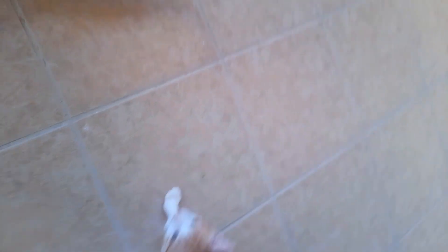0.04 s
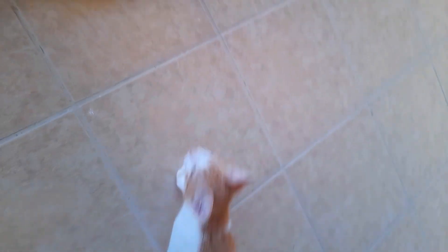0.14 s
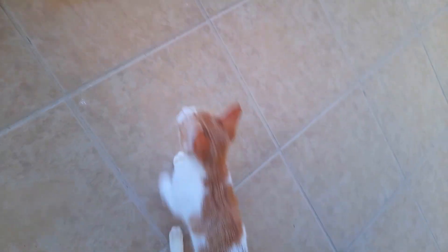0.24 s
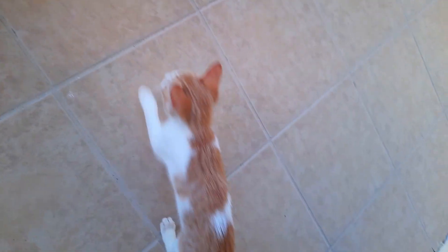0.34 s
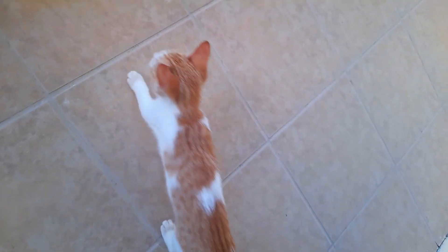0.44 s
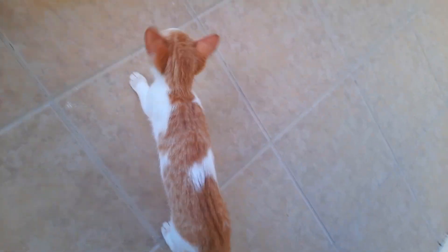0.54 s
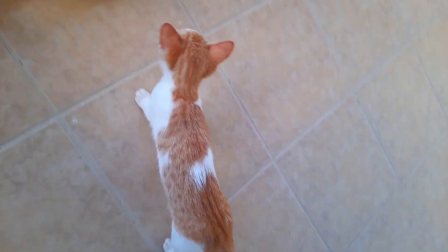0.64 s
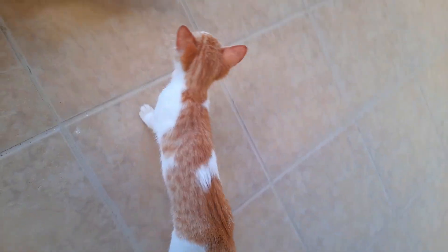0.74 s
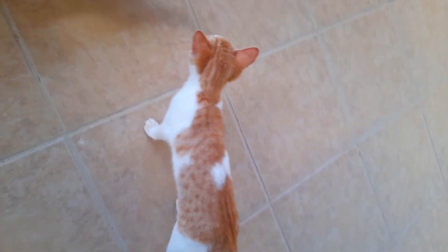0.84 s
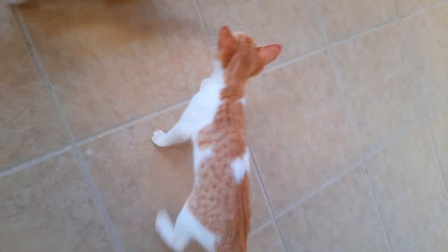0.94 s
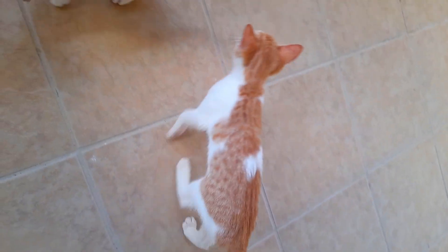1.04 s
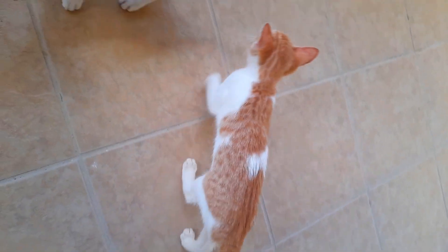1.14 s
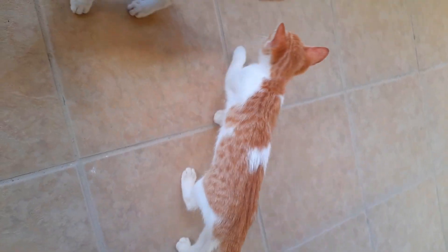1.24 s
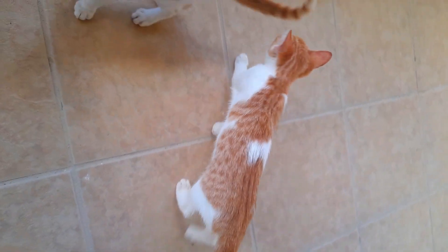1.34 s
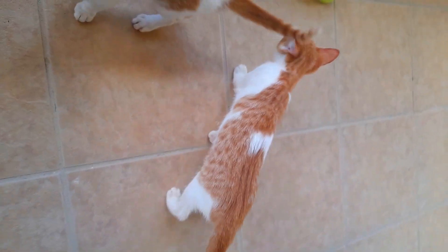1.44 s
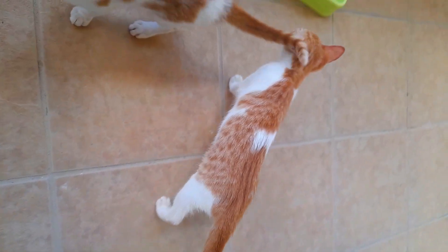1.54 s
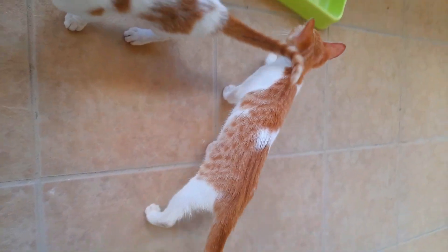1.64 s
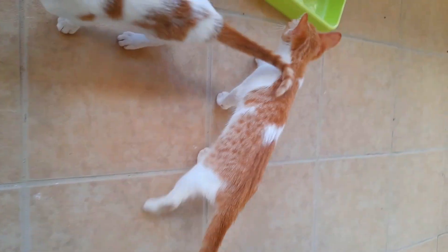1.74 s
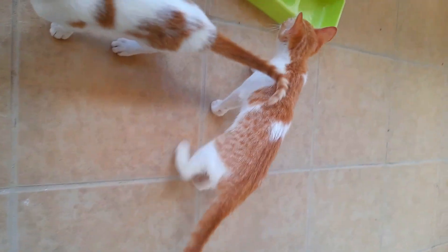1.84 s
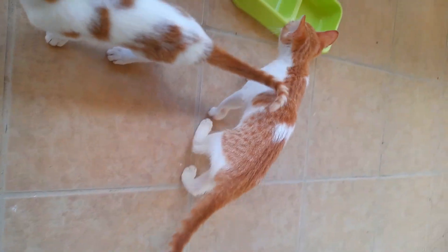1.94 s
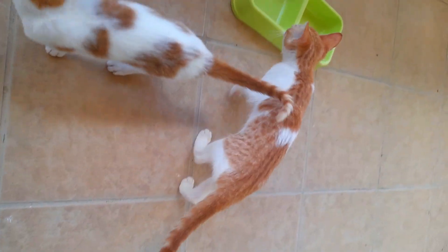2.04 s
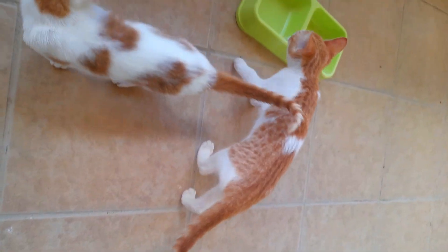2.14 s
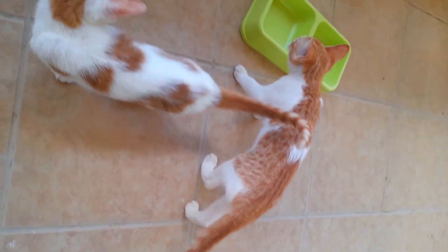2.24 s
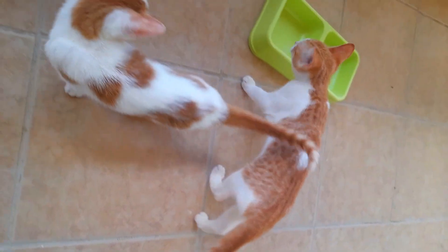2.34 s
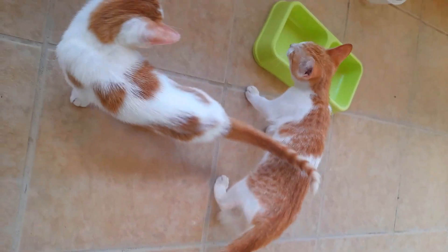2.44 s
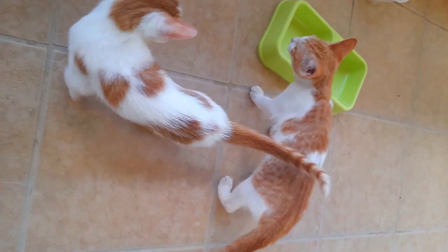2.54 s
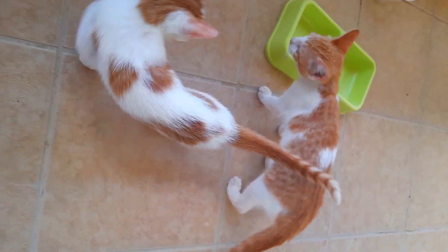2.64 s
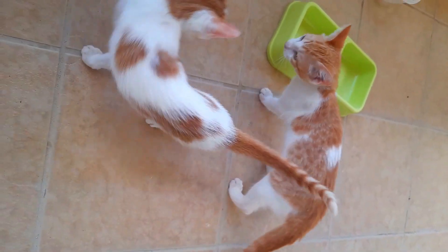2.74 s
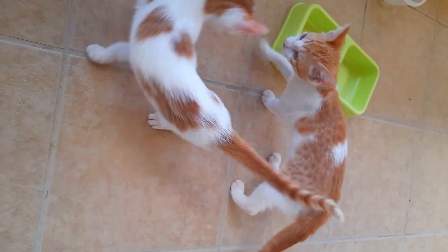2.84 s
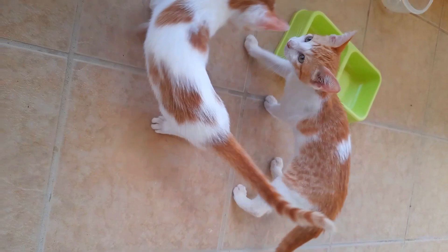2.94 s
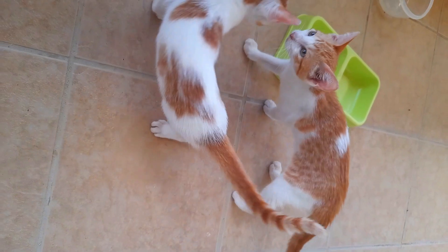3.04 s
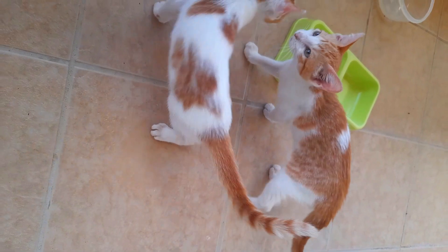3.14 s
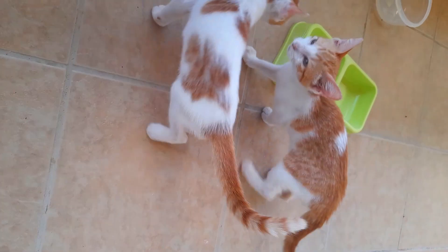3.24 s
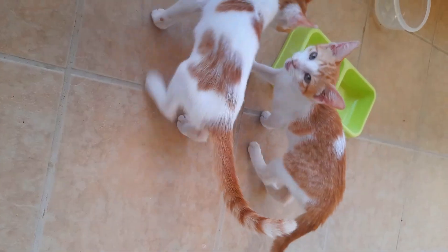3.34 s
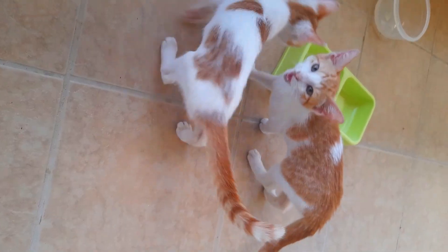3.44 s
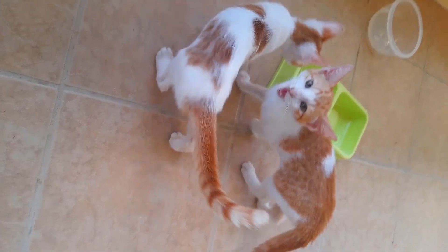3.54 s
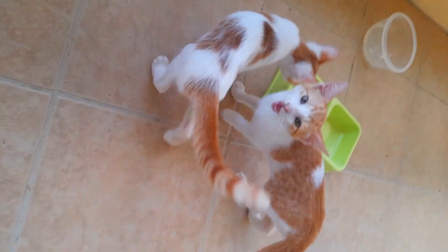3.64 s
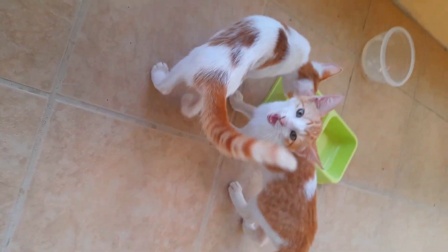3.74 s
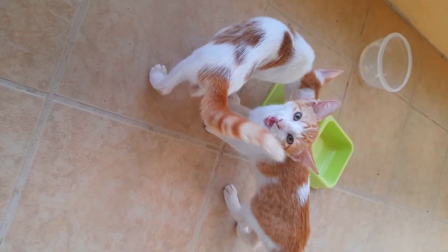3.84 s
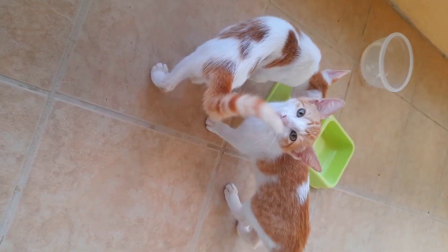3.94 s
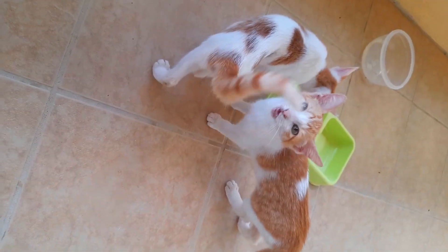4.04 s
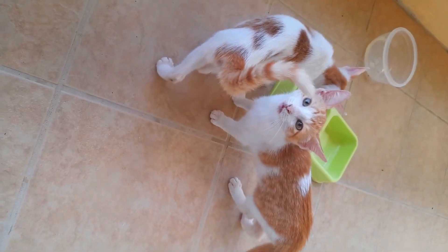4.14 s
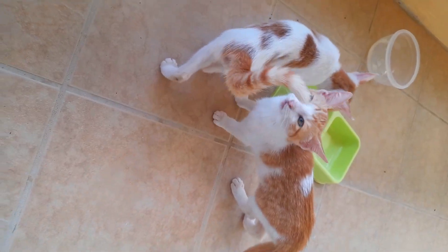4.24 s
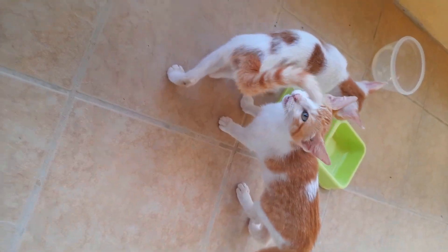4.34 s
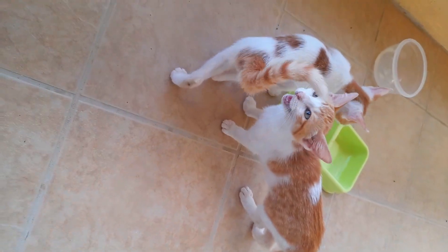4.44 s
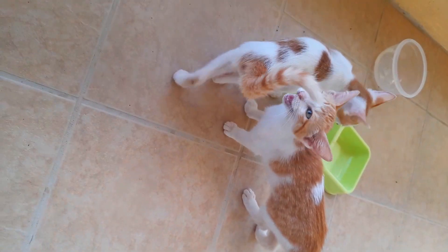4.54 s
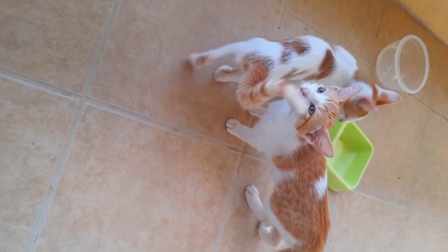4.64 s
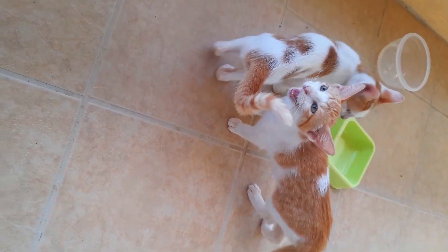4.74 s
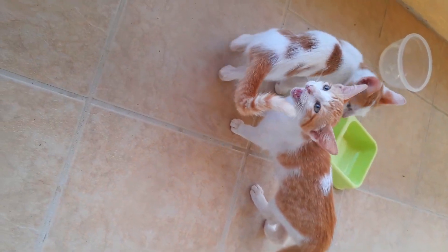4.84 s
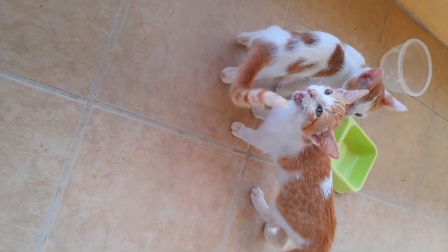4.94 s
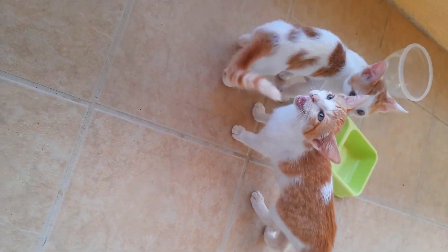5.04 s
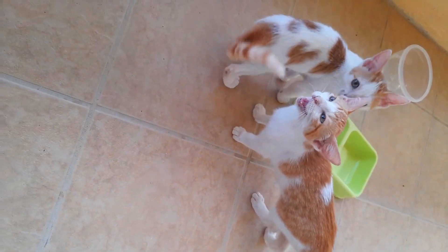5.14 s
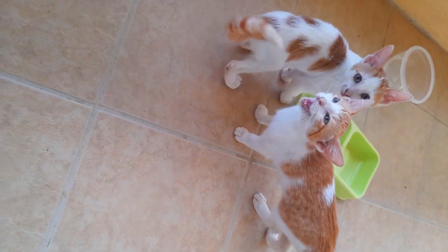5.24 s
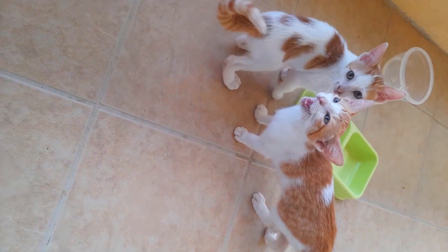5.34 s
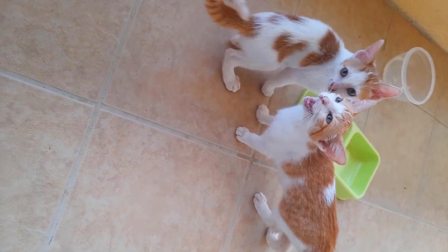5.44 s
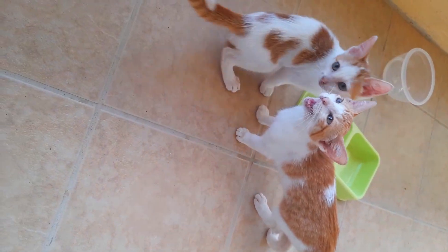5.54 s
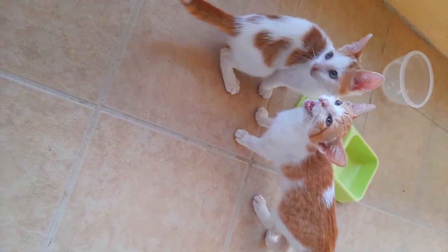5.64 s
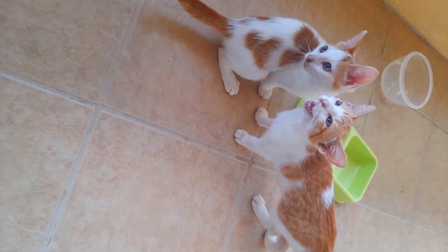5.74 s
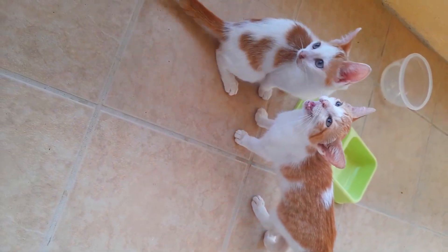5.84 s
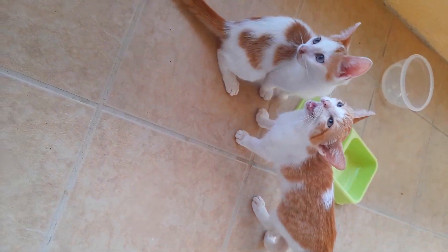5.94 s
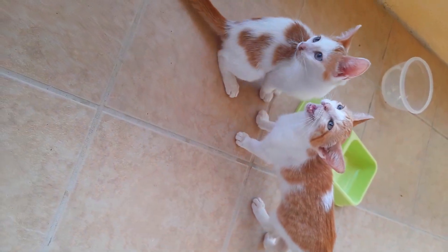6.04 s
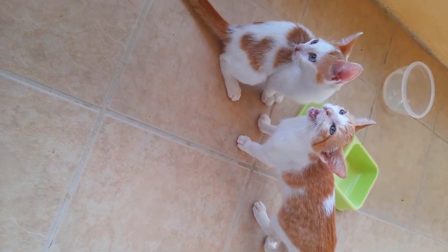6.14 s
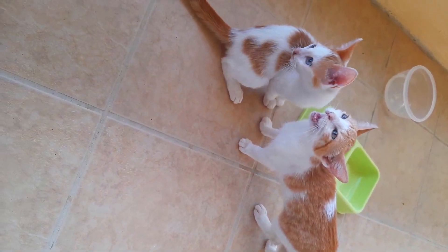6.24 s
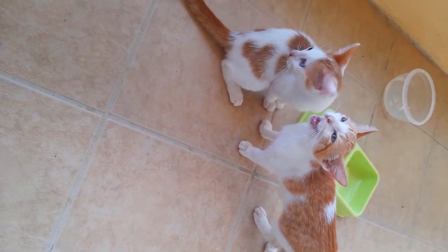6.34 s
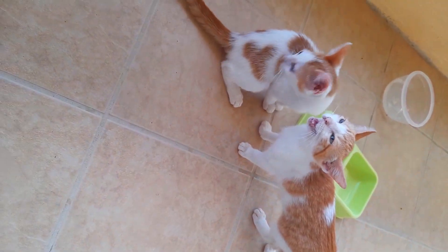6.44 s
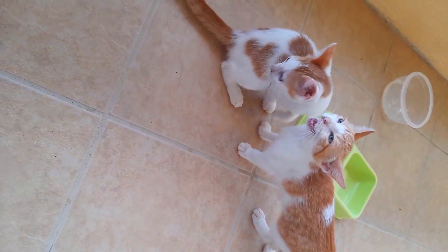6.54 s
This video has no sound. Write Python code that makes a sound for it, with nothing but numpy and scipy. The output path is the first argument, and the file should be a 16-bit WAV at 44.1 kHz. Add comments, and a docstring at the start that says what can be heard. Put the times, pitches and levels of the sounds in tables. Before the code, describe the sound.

After a brief cloth rustle and a few tiny claw ticks, a kitten gives a long, clear meow that rises and sinks. A second kitten answers with a thin high squeak and short chirps. The first meows twice more, the last call longest and loudest, and a shrill, hoarse squeal joins at the end. The stereo microphone is about a metre away in a tiled room with a short ring and faint background noise.

```python
"""A tiled floor between hard walls, where two kittens beg for food a metre from a hand-held stereo mic.
One gives three long clear meows, the other squeaks high: vocal folds make a stack of partials, the mouth
shapes it and breath leaks through. Claws and tongue click, chirps, soft voice blips and a small growl
slip in, and a hoarse squeal comes last. The walls ring briefly. Cloth rustles at the start, and low
background noise, hiss, mains hum, a faint tone and far insects lie underneath."""
import sys
import numpy as np
from scipy import signal
from scipy.fft import rfft, irfft, next_fast_len
from scipy.io import wavfile
from scipy.ndimage import uniform_filter1d

SR = 44100
rng = np.random.default_rng(int(sys.argv[2]) if len(sys.argv) > 2 else 0)


def wav_record(signal):
    """Record a signal, one row per channel, as 16-bit PCM in the file named by sys.argv[1]."""
    frames = np.transpose(np.atleast_2d(signal))
    bounded = np.clip(frames, -1, 1)
    # unit amplitude maps onto the largest positive 16-bit level
    quanta = np.round(bounded * 32767).astype(np.int16)
    wavfile.write(sys.argv[1], SR, quanta)


N = 289737
T = np.arange(N) / SR
PORT_LAG_MS, TOP_HZ = 0.23, 15600  # left mic port behind the right; the recorder's treble limit


def undb(db):
    """Gain of a level in dB."""
    return 10 ** (np.asarray(db) / 20)


def unit(x):
    """Scale to rms 1."""
    return x / np.sqrt(np.mean(x ** 2))


def curve(points):
    """Draw (seconds, value) points as a line through the whole scene."""
    return np.interp(T, *np.transpose(points))


def shape(points, hz):
    """Read a (Hz, dB) spectrum on a log axis."""
    f, db = np.transpose(points)
    return np.interp(np.log(np.maximum(hz, 1)), np.log(f), db)


def band(n, hz, width):
    """Noise of rms 1 in one resonance."""
    size = next_fast_len(n)
    f = np.fft.rfftfreq(size, 1 / SR)
    gain = 1 / (1 + ((f ** 2 - hz ** 2) / (f * width + 1e-9)) ** 2)
    return unit(irfft(rfft(rng.standard_normal(n), size) * gain, size)[:n])


def coloured(points, alike_hz):
    """Stereo noise of rms 1 with a given spectrum, narrower in the image below alike_hz."""
    size = next_fast_len(N)
    f = np.fft.rfftfreq(size, 1 / SR)
    mid, side = rfft(rng.standard_normal((2, size))) * undb(shape(points, f))
    alike = .55 / (1 + (f / alike_hz) ** 2)
    mid, side = mid * np.sqrt(1 + alike), side * np.sqrt(1 - alike)
    return unit(irfft(np.array([mid + side, mid - side]), size)[:, :N])


def walk(n, rate):
    """Smooth random wobble, rate steps a second, with a spread near 1."""
    hold = int(SR / rate)
    steps = np.repeat(rng.standard_normal(n // hold + 1), hold)
    return 1.3 * uniform_filter1d(uniform_filter1d(steps, hold), hold)[:n]


def walks(n, rate):
    """A function that deals left-right pairs of wobbles, cut at random from one long walk."""
    long = walk(3 * n, rate)
    return lambda: np.array([long[k:k + n] for k in rng.integers(0, 2 * n, size=2)])


def read(table):
    """A table's span, its columns as curves, and edge fades; no fade-out if it reaches the scene's end."""
    s, *columns = np.transpose(table)
    stop = np.inf if s[-1] > T[-1] - .05 else s[-1]
    span = slice(int(max(s[0], 0) * SR), int(min(stop * SR, N)))
    t = T[span]
    fades = np.clip(np.minimum((t - s[0]) / 0.0066, (stop - t) / 0.027), 0, 1)
    return span, [np.interp(t, s, c) for c in columns], fades


def place(x, left_db):
    """Pan a sound so the left is left_db louder than the right."""
    return x * undb(np.array([[left_db], [-left_db]]) / 2)


def decay(start, t60, rise_s):
    """Envelope with a fast attack that dies by 60 dB in t60 seconds."""
    t = np.clip(T - start, 0, None)
    return (1 - np.exp(-t / rise_s)) * np.exp(-np.log(1000) * t / t60)


# Low background noise, up with the calls and turned down between. Each row: time in seconds, level in dB.
LOW_NOISE_LEVEL = [(0, -66), (.44, -69.5), (.8, -64), (1.5, -75), (1.76, -67), (2.0, -69.5), (2.4, -65),
                   (2.5, -75), (3.3, -72.5), (3.62, -64.5), (3.75, -68), (4.1, -70), (4.37, -78),
                   (4.5, -69.5), (4.95, -68), (5.23, -67), (5.55, -63), (5.85, -70), (6.3, -66),
                   (6.39, -62), (6.57, -66.5)]
# Tone colour of the low noise and the hiss. Each row: frequency in Hz, relative level in dB.
LOW_NOISE_COLOUR = [(15, -42), (25, -58), (54, -7), (102, -3), (199, -12), (308, -11.5), (350, -10),
                    (399, -13.5), (972, -22), (1200, -44), (1560, -78), (2640, -120)]
HISS_COLOUR = [(400, -1.5), (800, -4.5), (1200, -12.5), (1800, -7.5), (2500, -13.5), (4500, -16),
               (8000, -16), (15500, -16)]


def room_tone():
    """The bed: low noise on the left, turned down between the calls, soft hiss and wavering mains hum."""
    low = coloured(LOW_NOISE_COLOUR, alike_hz=450) * undb(curve(LOW_NOISE_LEVEL) + 1.8 * walk(N, 9))
    hiss = coloured(HISS_COLOUR, alike_hz=300) * undb(-70.5 + 0.91 * walk(N, 12))
    hum = np.sqrt(2) * undb(-79.5 + 3.5 * walk(N, 11)) * np.sin(2 * np.pi * 95.6 * T)
    return place(low, left_db=9.2) + hiss + hum


# The insects' buzz. Each row: centre in Hz, width in Hz, base level in dB.
INSECT_BANDS = [(5090, 500, -83), (5790, 490, -82.5)]
# Its rise and fall. Each row: time in seconds, gain in dB.
INSECT_SWELL = [(0, -2), (2.2, 5), (2.4, 2), (2.9, 6), (3.3, -3.5), (3.5, -4.5), (6.57, -45)]


def insects():
    """Far insects blur into narrow bands of high noise that swell, then fade away."""
    out = np.zeros((2, N))
    for hz, width, db in INSECT_BANDS:
        swell_db = curve(INSECT_SWELL) + 1.8 * walk(N, 3.9)
        out += undb(db + swell_db) * np.array([band(N, hz, width), band(N, hz, width)])
    return out


# A brush of cloth. Each row: time in seconds, level in dB.
RUSTLE_LEVEL = [(0, -65), (.12, -64), (.17, -69), (.246, -62.5), (.258, -58.5), (.274, -66), (.282, -48),
                (.296, -58), (.36, -65), (.4, -71), (.5, -80)]


def cloth_rustle():
    """Rubbing cloth gives broad noise with a fast, grainy flutter."""
    span, (db,), fades = read(RUSTLE_LEVEL)
    cloth = coloured([(700, -0.5), (3000, -2), (9000, -3), (14000, -1.5)], alike_hz=2000)
    cloth *= undb(2.2 * walk(N, 93.2))
    out = np.zeros((2, N))
    out[:, span] = cloth[:, span] * undb(db) * fades
    return out


# A low tone under the opening. Each row: time in seconds, pitch in Hz, level in dB.
FAINT_TONE = [(0, 241, -74), (.1, 242, -75.5), (.55, 247.4, -73), (.85, 248.6, -70.5), (1.15, 251, -69),
              (1.5, 242.3, -78)]


def faint_tone():
    """A quiet sine that wavers in pitch and level."""
    span, (hz, db), fades = read(FAINT_TONE)
    level = undb(db + 3.5 * walk(len(hz), 11.8))
    phase = 2 * np.pi * np.cumsum(hz + 3 * walk(len(hz), 15.1)) / SR
    out = np.zeros(N)
    out[span] = np.sqrt(2) * level * fades * np.sin(phase)
    return out


# Claw and tongue ticks. Each row: start in seconds, level in dB, centre in Hz, 60 dB decay in seconds.
CLICKS = [(0.0404, -50.5, 5800, 0.021), (0.1093, -53, 6000, 0.022), (0.2562, -45.5, 6140, 0.033),
          (0.2808, -38, 6050, 0.017), (0.2994, -54, 6000, 0.03), (2.2294, -51, 6000, 0.026),
          (3.7594, -38, 6000, 0.018), (4.373, -54.5, 5900, 0.012)]


def clicks():
    """Each tap of claw or tongue is a tiny burst of bright noise."""
    return sum(undb(db) * decay(start, t60, rise_s=0.0014) * band(N, hz, 1.35 * hz)
               for start, db, hz, t60 in CLICKS)


# Roughness of both voices. Each row: time in seconds, pitch jitter in percent, half-pitch depth 0-1.
HOARSENESS = [(.5, .5, 0), (.6, 1, .1), (.64, 1, .7), (.69, .8, .6), (.72, .45, 0), (1.45, .5, 0),
              (1.51, .8, 0), (1.53, 3, .2), (1.58, 1.6, 0), (1.62, .5, 0), (1.69, 1.2, 0), (1.76, .5, 0),
              (1.9, .6, 0), (1.94, 1.3, 0), (2.04, .8, 0), (2.08, 1.6, 0), (3.4, 2.8, .1), (3.58, 1.8, .1),
              (3.66, .7, 0), (3.98, .7, 0), (4.02, 3.5, .3), (4.45, 2.5, .1), (4.7, 1.1, 0), (4.85, .25, 0),
              (5.45, .25, 0), (5.6, .5, 0), (5.75, .2, 0), (6.57, .15, 0)]
# EQ of the upper partials (mouth) and the very top (edge). Each row: frequency in Hz, gain in dB.
MOUTH_EQ = [(2500, -3), (3600, 12.5), (4500, 7), (5400, -1.5), (6300, -9)]
EDGE_EQ = [(6300, -7), (8300, -11), (10500, -2), (12000, -14), (15000, -11.5)]
# Colour of the breath. Each row: centre in Hz, width in Hz, gain in dB.
BREATH_BANDS = [(1890, 2500, -2), (3900, 4700, 0), (11200, 7800, -15.5)]
# Air leaking past the vocal folds. Each row: time in seconds, level in dB.
BREATH_LEVEL = [(.5, -64.5), (.7, -65.5), (1.0, -66.5), (1.45, -65), (1.55, -65.5), (1.65, -65.5),
                (1.9, -72), (2.1, -63.5), (2.3, -68.5), (3.35, -76), (3.45, -58), (3.65, -63), (3.9, -66),
                (4.02, -58.5), (4.1, -82), (4.43, -62), (4.7, -64.5), (4.9, -66.5), (5.3, -65), (5.6, -65),
                (5.9, -65.5), (6.57, -69)]


def voice(table, drawn_partials):
    """Vocal folds make a stack of partials, the mouth sets their levels, and breath pulses once a cycle."""
    span, (hz, *low_db, edge_db, pan_db, lag_ms), fades = read(table)
    hz = uniform_filter1d(hz, size=350)  # pitch bends without corners
    n, mouth_db, loudest_db = len(hz), low_db[-1], np.max(low_db[:drawn_partials], axis=0)
    times, jitter_percent, half_depth = np.transpose(HOARSENESS)
    jitter = np.interp(T[span], times, jitter_percent) / 100
    phase = 2 * np.pi * np.cumsum(hz * (1 + jitter * walk(n, 220))) / SR
    share_db = 10 * np.log10(hz / 2000)  # a band's power is split over its partials
    side = np.array([[-.5], [.5]])
    swell, drift, shimmer, blur = walks(n, 20), walks(n, 10), walks(n, 70), walks(n, 300)
    call = np.zeros((2, n))
    for k in range(1, int(TOP_HZ / hz.min()) + 1):
        f = k * hz
        if k <= drawn_partials:
            db = low_db[k - 1]
        else:
            high = np.clip((f - 6200) / 800, 0, 1)  # crossfade from mouth band to edge band
            db = share_db + (1 - high) * (mouth_db + shape(MOUTH_EQ, f))
            db += high * (edge_db + shape(EDGE_EQ, f))
        # standing waves push the loudest partial from port to port; weaker ones drift on their own
        lead = np.minimum(undb(db - loudest_db), 1)
        drift_db = -lead * pan_db * side + (1 - lead) * 3.0 * swell()
        drift_db += (2.4 - lead) * shimmer()  # quick unevenness, least on the loudest partial
        lag_s = (lead * lag_ms + (1 - lead) * PORT_LAG_MS) / 1000
        turn = 2 * np.pi * f * lag_s * side + (1 - lead) * .6 * drift()
        turn += (f / 12000) ** 2 * (1 + 80 * jitter) * blur()  # uneven cycles smear high partials most
        call += np.sqrt(2) * undb(db + drift_db) * (f < TOP_HZ) * np.sin(k * phase + 1.5 * k + turn)
    call *= 1 + np.interp(T[span], times, half_depth) * np.sin(phase / 2)  # strong, weak cycles alternate
    breath = np.array([sum(undb(db) * band(n, f, width) for f, width, db in BREATH_BANDS)
                       for port in range(2)])
    call += undb(curve(BREATH_LEVEL)[span]) * breath * (1 + .5 * np.sin(phase))
    out = np.zeros((2, N))
    out[:, span] = call * fades
    return out


# Three meows. Each row: time in seconds, pitch in Hz, levels of partials 1 to 5 in dB, mouth and edge
# band levels in dB before EQ, then the loudest partial's leftward pan in dB and left lag in ms.
FIRST_MEOW = [(0.51, 673.0, -81, -76.0, -68, -78.0, -80, -76, -75.0, 4.0, 0.37),
              (0.525, 690, -75.0, -64, -59, -60, -67.0, -70, -75, -1, 0.35),
              (0.56, 697, -71.0, -54, -59, -53.5, -62, -65, -72, 2, 0.46),
              (0.6, 755.5, -76, -59, -66.0, -62, -76, -71, -76, 1, -0.18),
              (0.63, 768, -76, -60, -76, -59, -85, -78, -84, 4.0, 0.22),
              (0.67, 918, -67, -64, -58.5, -81, -74, -74, -74, 6, 0.27),
              (0.7, 839, -68.5, -58.0, -61.5, -75, -74.0, -65, -78, 6, -0.053),
              (0.77, 863, -70, -52, -51.5, -53, -89, -61.0, -70, -7.0, 0.13),
              (0.92, 848, -66.5, -54.5, -56.5, -54.5, -63, -56.5, -63.5, 3.5, 0.021),
              (0.995, 832.6, -67, -44.5, -48, -52.0, -68, -58, -64.5, 1.5, 0.23),
              (1.145, 784, -63.5, -48.5, -51, -54.5, -69, -61.5, -66.0, 4, 0.3),
              (1.22, 753.7, -68.5, -54.5, -57.0, -63.5, -64.0, -72, -72, -4.0, 0.25),
              (1.37, 664, -67.5, -60.5, -51, -58.5, -79, -72.5, -72, 9.5, 0.098),
              (1.514, 563.4, -63, -57, -48, -52.5, -70.0, -84, -71, 7, 0.22),
              (1.526, 476.4, -50, -53, -60, -51, -58, -77, -62, 3, 0.17),
              (1.56, 470.5, -50.5, -63, -56, -54.5, -66.0, -69, -69, 4, 0.027),
              (1.62, 464.4, -59, -56, -72, -48.0, -78.0, -88, -71, 8, 0.3)]
SECOND_MEOW = [(3.33, 487.4, -84, -66.0, -85, -81, -93, -100, -81, 8, 0.34),
               (3.39, 530.5, -92, -68.0, -72.0, -66, -79, -77, -79, -6, 0.072),
               (3.43, 579.4, -83, -57, -70, -66, -52.5, -72, -75, 2.0, 0.2),
               (3.48, 676, -68, -55, -57.0, -69, -69, -73, -68, 1.5, 0.37),
               (3.54, 766, -59.5, -62, -61.0, -47, -65, -62.5, -62.5, -7, 0.18),
               (3.6, 836, -60.0, -63, -61, -54.5, -60, -60.5, -59.5, 2, 0.13),
               (3.669, 872, -64, -54.5, -50, -60, -63.5, -56, -60.5, -2.0, 0.19),
               (3.74, 854, -58.5, -51.5, -51.0, -56, -58.0, -53, -55, 2, 0.15),
               (3.81, 818.3, -65.0, -48.5, -50, -61, -60, -59, -56, 4.5, 0.23),
               (3.88, 807.5, -59, -52.5, -52.5, -56.0, -58, -57, -58.0, 3, 0.13),
               (3.94, 744, -56.5, -61.5, -50.0, -60, -58.0, -70, -59, -9, 0.13),
               (3.996, 707.6, -54.5, -54.5, -54, -62.0, -69, -69, -62, 0, 0.24),
               (4.007, 569, -49, -41.5, -46, -56.0, -64, -64, -58.0, 4, 0.27),
               (4.04, 564, -51, -57, -57.5, -64.0, -79, -80, -62.0, 5, 0.63),
               (4.07, 563, -62, -73, -66, -69, -78, -91, -73, 1, 0.06),
               (4.119, 570.7, -74, -74, -75.0, -79.0, -83.0, -81.0, -80, 4.0, -0.48)]
LAST_MEOW = [(4.42, 587, -82, -64, -72.0, -83.0, -68, -83, -78, -3, 0.2),
             (4.437, 599, -80, -58, -61, -83, -60, -71, -85, 1, 0.27),
             (4.47, 648, -73, -59, -57, -65, -73, -64.5, -72, 0.0, 0.23),
             (4.53, 733, -62, -64, -73, -66, -59, -68, -64.5, 2, 0.24),
             (4.598, 774, -66, -59, -65, -63.0, -63, -60.5, -67.5, -0.5, 0.21),
             (4.734, 839.4, -60.5, -56.5, -54.5, -59, -62.0, -49, -60, 0.0, 0.28),
             (4.802, 853, -62, -46.5, -51, -56.5, -63, -57.5, -57, 0.5, 0.21),
             (4.938, 836.2, -55.5, -47.5, -52, -58, -55, -46.5, -57, -2.5, 0.28),
             (5.006, 820.6, -58.0, -54.5, -43, -59, -61.5, -49.5, -56, -1.5, 0.21),
             (5.143, 777, -57, -47.5, -43.5, -56, -47.5, -58.5, -53.5, 2, 0.19),
             (5.209, 779.7, -60, -49, -42.0, -55, -46.5, -56.5, -53.5, 1.5, 0.2),
             (5.344, 757.5, -50, -48.5, -37, -48.5, -52.5, -52.5, -53, -9, 0.17),
             (5.415, 762, -52, -48.5, -39.5, -49, -50.0, -55.5, -55.0, 0, 0.29),
             (5.552, 718, -47, -51, -34.5, -38, -52.5, -56.5, -52.5, -4, 0.13),
             (5.62, 690.5, -54.5, -47, -33, -45.5, -57, -62, -53.5, -12, 0.21),
             (5.755, 647, -56, -48, -36.5, -41.5, -52.5, -58, -56.0, 7.5, 0.2),
             (5.821, 644.6, -56, -45.5, -32, -47, -48.5, -60, -54, 7.5, 0.058),
             (5.957, 632.9, -57, -44.5, -39.5, -47.5, -54.5, -55.5, -62, -9.5, 0.35),
             (6.027, 628, -62.5, -46, -35.5, -40.5, -60, -55, -62.5, 8.5, 0.43),
             (6.162, 610.4, -52, -38.0, -35, -47, -55, -60, -61.0, 4.5, 0.28),
             (6.232, 601.4, -57, -38.5, -35, -48, -53, -59, -60.5, 2.5, 0.29),
             (6.366, 590.4, -58, -43, -32, -43, -50, -62.5, -60.5, 5, 0.41),
             (6.433, 587.3, -57, -45.5, -41, -36, -47, -62, -64, 3.5, 0.18),
             (6.55, 584, -58.5, -43.5, -33.0, -40.5, -49.5, -64, -64.5, 8, 0.31)]


def meows():
    """The first kitten's long calls, each arching up in pitch and sinking again."""
    return sum(voice(meow, drawn_partials=5) for meow in (FIRST_MEOW, SECOND_MEOW, LAST_MEOW))


# The squeak. Each row: time in seconds, pitch in Hz, levels of partials 1 to 4 in dB, edge band level
# in dB before EQ, then the loudest partial's leftward pan in dB and left lag in ms.
HIGH_SQUEAK = [(1.542, 1750, -51, -65, -56, -66.0, -61, 7.0, -0.077),
               (1.59, 1854, -51, -53, -60, -81, -68, 1, 0.46),
               (1.64, 1888, -52, -53, -64.0, -74, -63, -1, 0.38),
               (1.69, 1932, -53, -62, -65, -64, -57.5, 0, 0.41),
               (1.8, 1933, -49, -50, -74, -77.0, -66, 5.5, 0.29),
               (1.86, 1916, -56, -64, -78, -71, -61.5, 5.5, 0.41),
               (1.91, 1912.7, -57, -60, -69, -66, -62, 8, 0.032),
               (1.97, 1870, -55, -64.0, -63.0, -63, -60.5, 1, 0.081),
               (2.03, 1853, -54, -63, -68.0, -62, -56.5, 5.5, 0.36),
               (2.08, 1788, -57, -62.0, -57.5, -69, -65, 2, 0.45),
               (2.12, 1754, -51.5, -60, -59, -64.0, -69, 6, 0.41),
               (2.16, 1677, -47.5, -67, -57, -75, -66.0, -2, 0.46),
               (2.2, 1648, -49.5, -69, -63, -67, -66, 10, 0.53),
               (2.23, 1605, -53.5, -66, -76, -73, -73, -1, 0.43),
               (2.26, 1575, -61, -78, -88, -70, -73, 3, 0.05),
               (2.33, 1590, -71, -89, -89, -85, -77.0, 10.0, 0.62)]


def squeak():
    """The second kitten's vocal folds run much faster, in one thin arching call."""
    return voice(HIGH_SQUEAK, drawn_partials=4)


# Chirps over the squeak. Each row: start in seconds, level in dB, second partial's pitch in Hz,
# 60 dB decay in seconds, fundamental's level against the second partial in dB.
CHIRPS = [(1.693, -40.5, 3245, 0.41, -9), (1.9216, -37.5, 3183, 0.27, -13), (2.0552, -49.5, 3130, 0.19, 4),
          (2.1615, -47, 2796, 0.19, -5.5)]


def chirps():
    """Short high peeps: four jittery partials that start sharply and die away."""
    out = np.zeros(N)
    for start, db, hz, t60, fundamental_db in CHIRPS:
        phase = 2 * np.pi * np.cumsum(hz * (1 + .022 * walk(N, 260))) / SR
        partials = [(.5, fundamental_db), (1, 0), (1.5, -16.5), (2, -14)]  # pitch ratio, dB
        stack = sum(undb(gain_db) * np.sin(ratio * phase) for ratio, gain_db in partials)
        out += undb(db) * decay(start, t60, rise_s=0.0022) * stack
    return out


# A small growl. Each row: time in seconds, level in dB.
GROWL_LEVEL = [(2.07, -82), (2.15, -62), (2.24, -67), (2.36, -76)]


def growl():
    """A low rasp of noise under the end of the squeak."""
    span, (db,), fades = read(GROWL_LEVEL)
    out = np.zeros(N)
    out[span] = undb(db) * fades * band(len(db), hz=376, width=280)
    return out


# Soft voice blips. Each row: start in seconds, level in dB, pitch in Hz, 60 dB decay in seconds.
VOICE_BLIPS = [(2.251, -46, 797, 0.12), (3.307, -54, 937, 0.062), (4.331, -62, 973, 0.18)]


def voice_blips():
    """Short soft blips of voice at the edges of the calls, each one fading sine."""
    return sum(undb(db) * decay(start, t60, rise_s=0.00056) * np.sin(2 * np.pi * hz * T)
               for start, db, hz, t60 in VOICE_BLIPS)


# The closing squeal. Each row: time in seconds, top pitch in Hz, level in dB.
HOARSE_SQUEAL = [(6.29, 4250, -59), (6.33, 4600, -51), (6.38, 4700, -45), (6.46, 4715, -41),
                 (6.51, 4630, -44), (6.57, 4550, -44.5)]


def squeal():
    """A shrill note, hoarse because its pitch keeps slipping down from the top and its level shakes."""
    span, (hz, db), fades = read(HOARSE_SQUEAL)
    slip = .045 * np.abs(walk(len(hz), 700))
    phase = 2 * np.pi * np.cumsum(hz * (1 - slip)) / SR
    stack = np.sin(phase) + undb(-33) * np.sin(2 * phase) + undb(-15) * np.sin(3 * phase)
    out = np.zeros(N)
    out[span] = undb(db + 2 * walk(len(hz), 162.3)) * fades * stack
    return out


# Slaps off floor and walls. Each row: left and right arrival in ms (direct is near 1), gain in dB.
REFLECTIONS = [(2.9, 3.6, -24), (7.3, 6.1, -16.5), (12.7, 12, -8.5)]


def room(x, t60=.3, tail_db=-16):
    """Sound arrives directly, bounces off tiles and walls and leaves a short tail."""
    t = np.arange(int(.5 * SR)) / SR
    tail = rng.standard_normal((2, len(t))) * np.exp(-np.log(1000) * t / t60) * (t > .012)
    tail = signal.lfilter([1], [1, -.4], tail)  # walls and air dull the tail
    response = undb(tail_db) * tail / np.sqrt(np.sum(tail ** 2, axis=1, keepdims=True))
    for left_ms, right_ms, db in [(0.98, 0.95, 0)] + REFLECTIONS:
        response += undb(db) * np.sinc((t - np.array([[left_ms], [right_ms]]) / 1000) * SR)
    lead = int(SR / 1000)  # skip the direct sound's 1 ms of delay
    return signal.fftconvolve(x, response, axes=1)[:, lead:N + lead]


def scene():
    """The kittens ring in the room, their small noises a little to the left, over the quiet bed."""
    calls = meows() + squeak()
    small = chirps() + voice_blips() + clicks() + squeal() + growl()
    late_left = np.roll(small, int(PORT_LAG_MS * SR / 1000))
    kittens = calls + place(np.array([late_left, small]), left_db=4.5)
    return room(kittens) + room_tone() + insects() + cloth_rustle() + faint_tone()


def record(dry):
    """The recorder cuts the top with a steep low-pass."""
    return signal.sosfilt(signal.ellip(10, .2, 75, TOP_HZ, fs=SR, output="sos"), dry)


dry = scene()
out = record(dry)
wav_record(out)
```